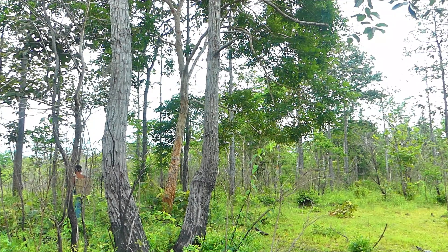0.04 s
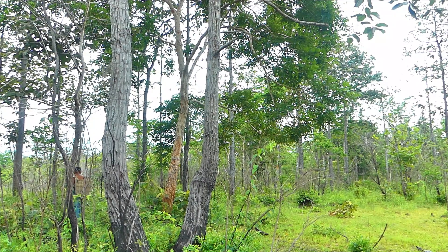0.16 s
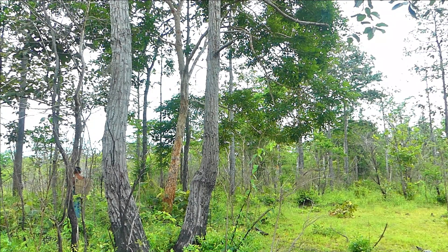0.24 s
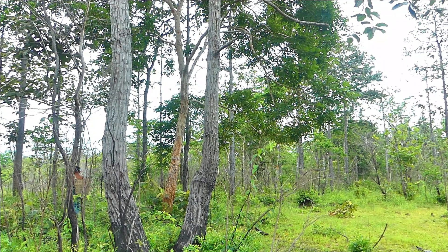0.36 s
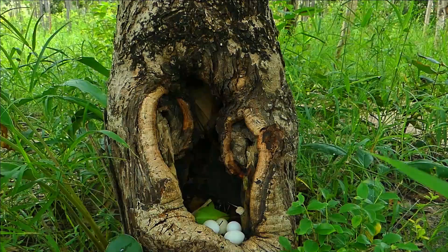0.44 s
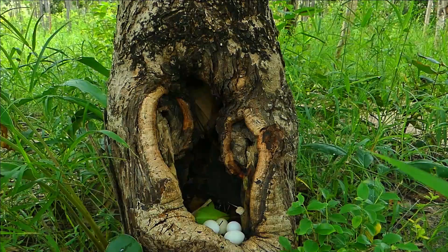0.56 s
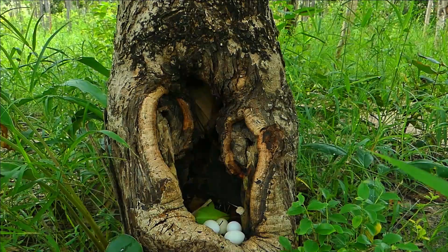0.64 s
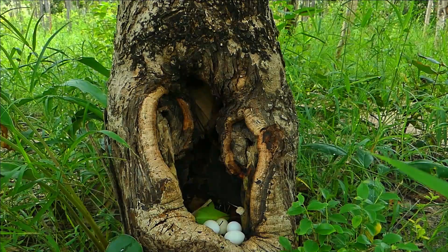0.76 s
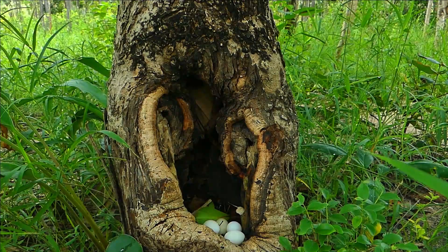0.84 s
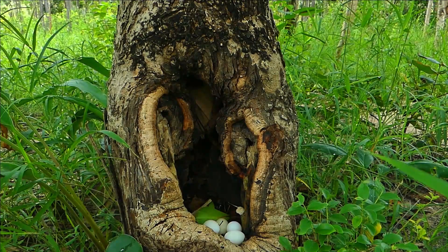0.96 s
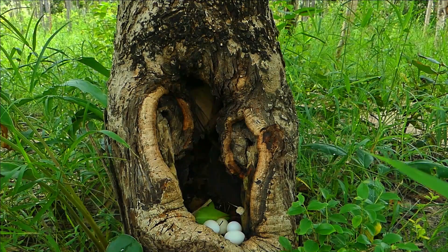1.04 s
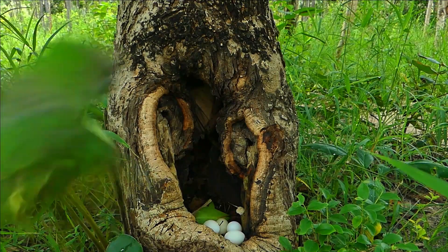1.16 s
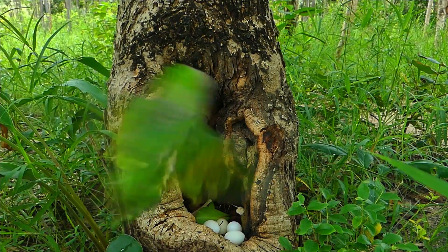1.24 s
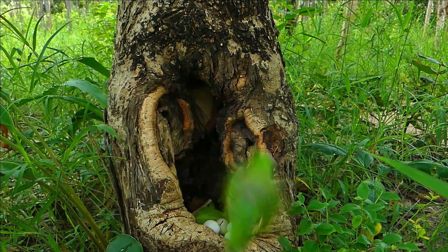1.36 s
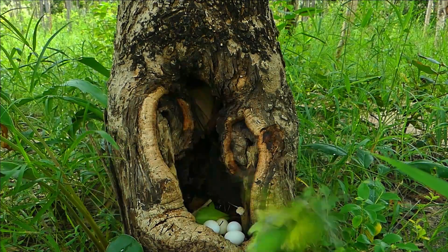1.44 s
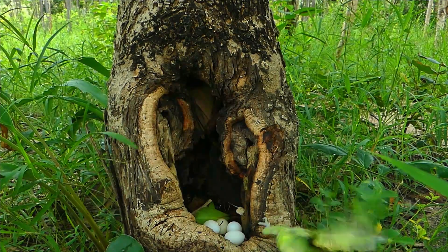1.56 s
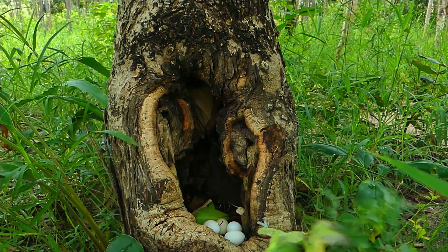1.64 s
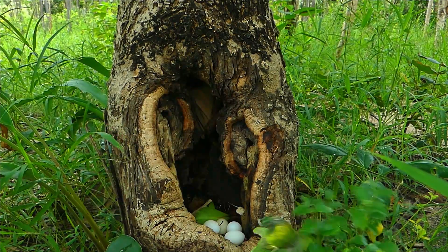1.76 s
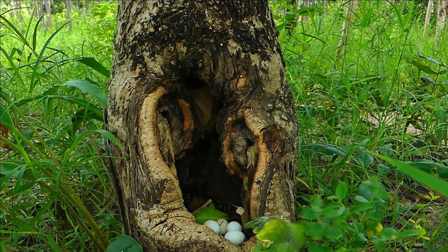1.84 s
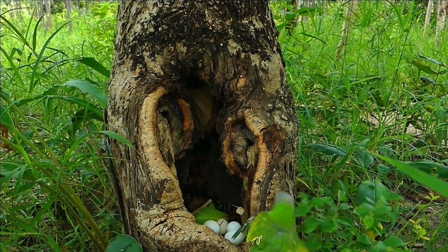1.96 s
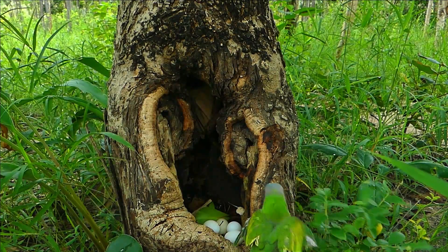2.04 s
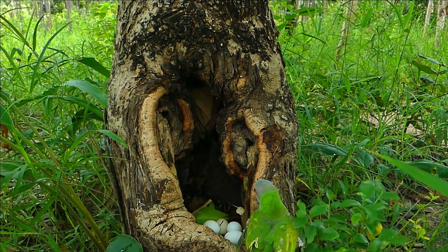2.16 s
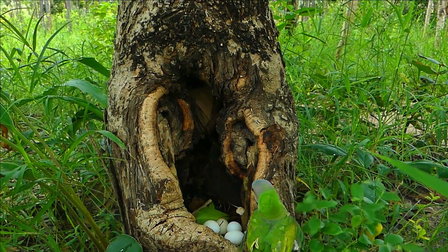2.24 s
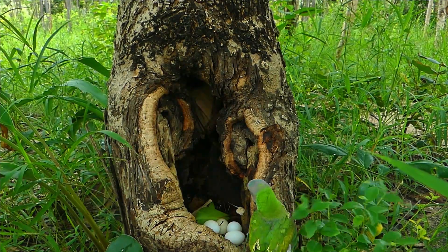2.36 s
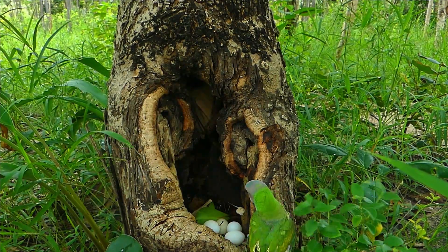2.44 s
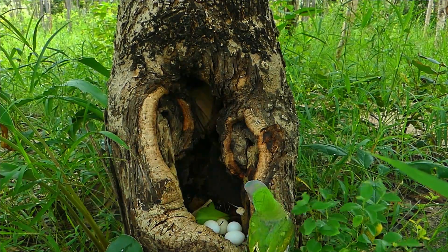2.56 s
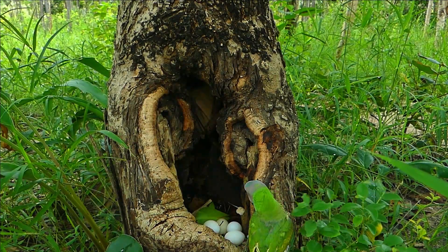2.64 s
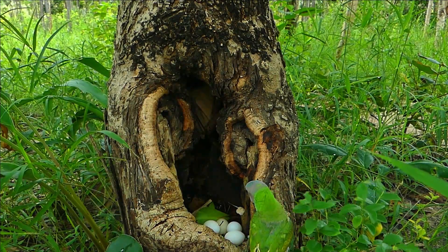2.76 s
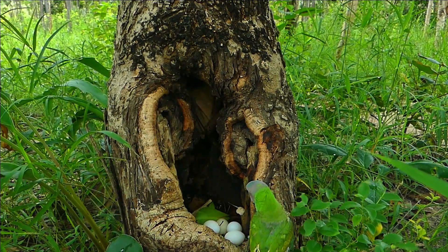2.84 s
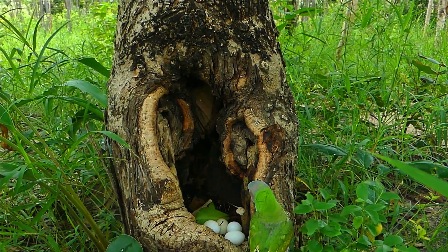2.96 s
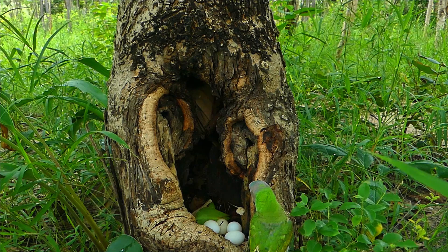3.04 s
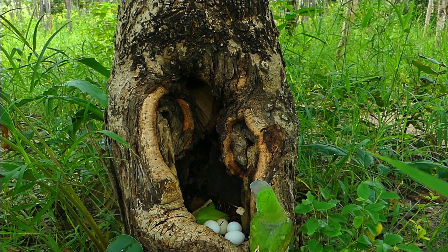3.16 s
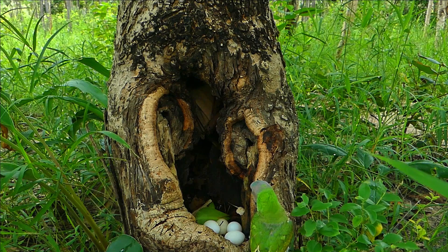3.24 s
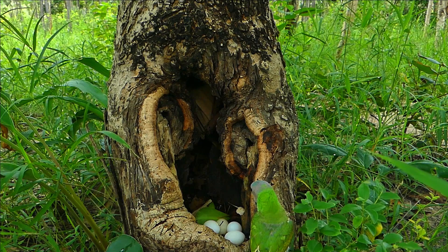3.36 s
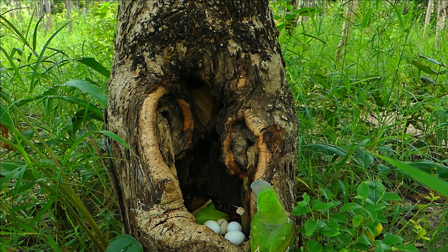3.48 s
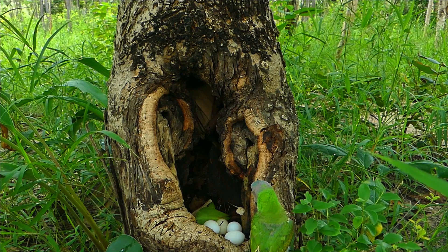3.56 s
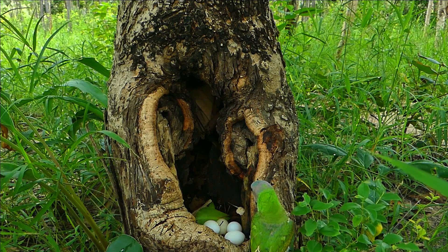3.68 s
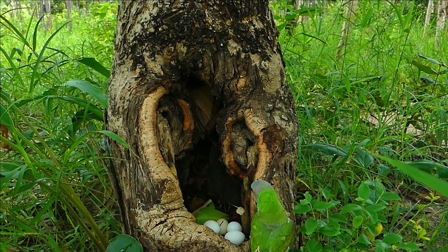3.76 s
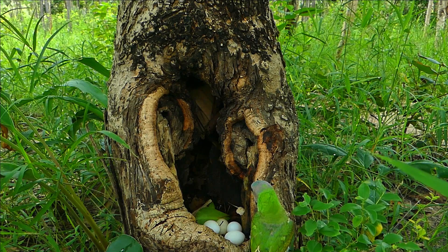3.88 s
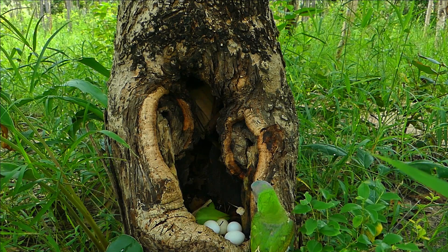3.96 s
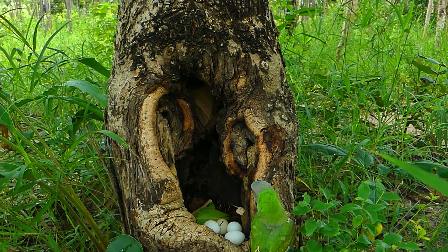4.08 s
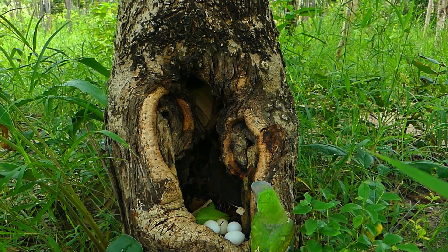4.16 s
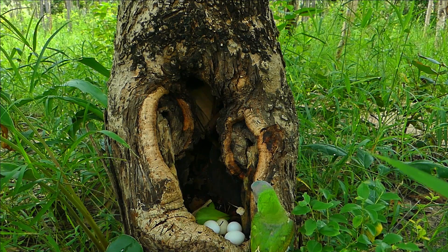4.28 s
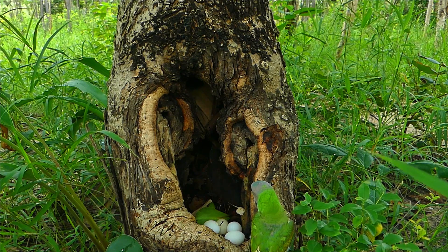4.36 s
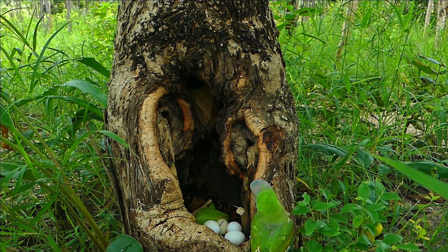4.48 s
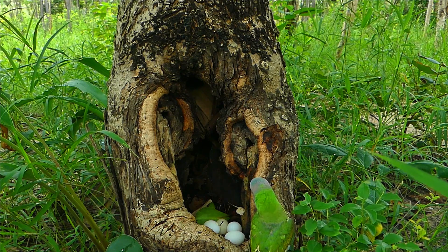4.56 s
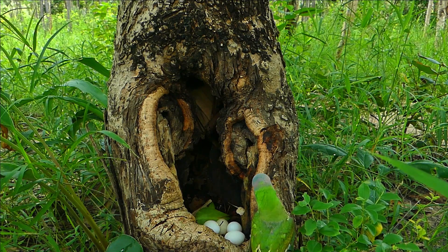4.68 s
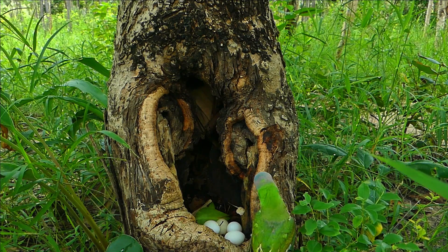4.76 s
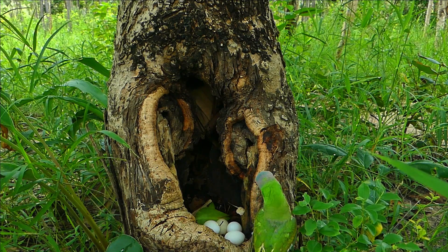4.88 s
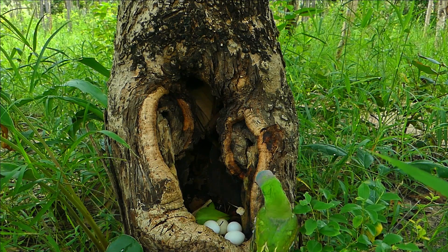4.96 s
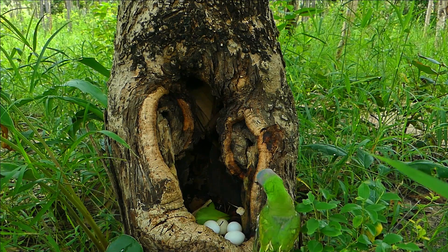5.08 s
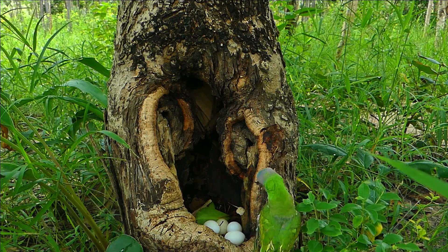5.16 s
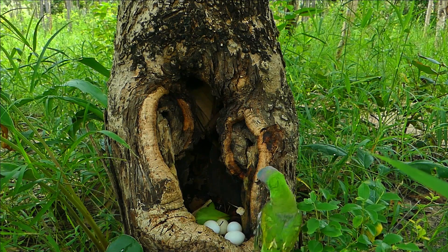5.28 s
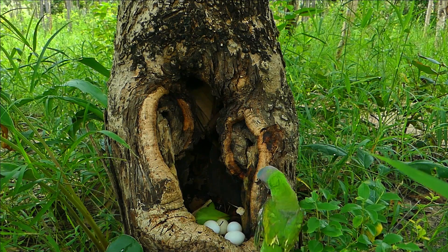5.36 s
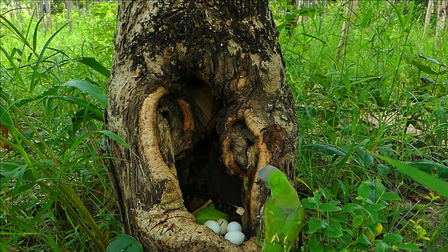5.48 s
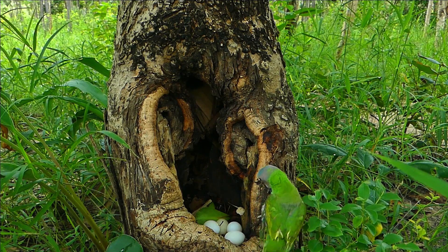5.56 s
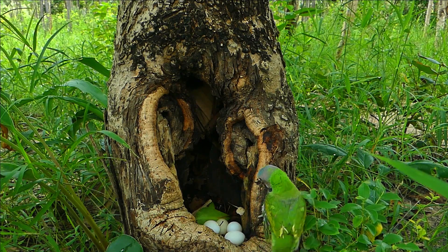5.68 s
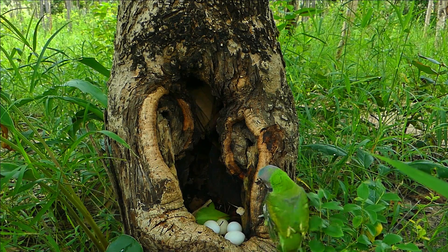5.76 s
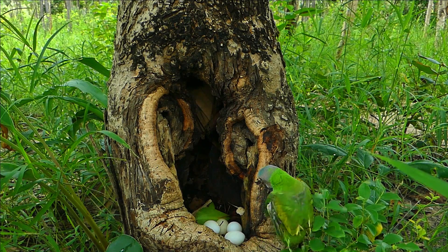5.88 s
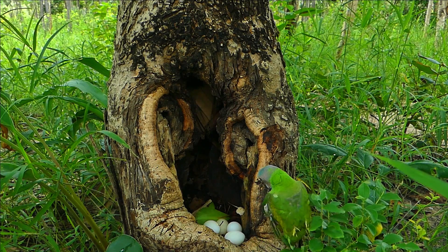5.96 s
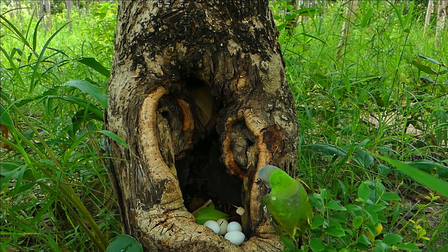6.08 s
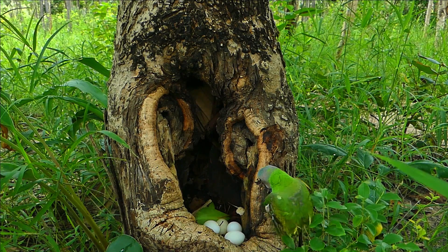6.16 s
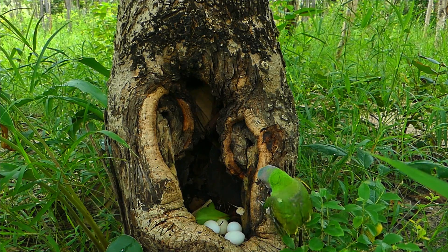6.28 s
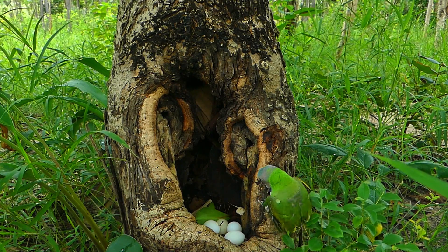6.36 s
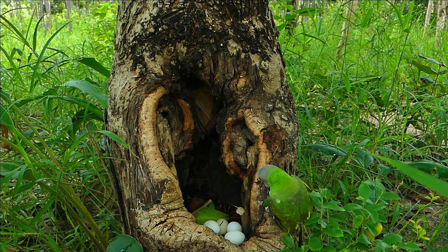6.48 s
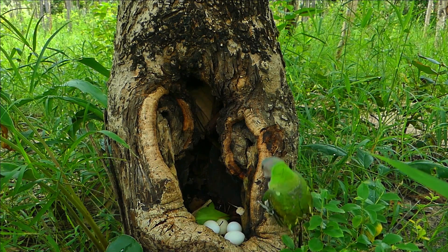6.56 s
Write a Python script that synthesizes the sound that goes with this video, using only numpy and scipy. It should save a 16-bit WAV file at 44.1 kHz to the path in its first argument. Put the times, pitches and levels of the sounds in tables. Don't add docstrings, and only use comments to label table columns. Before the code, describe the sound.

Soft insect hiss and dull forest air surround a hollow trunk, the opening moment a slightly different, wider insect ambience with faint distant calls. Two microphones close to the nest catch a bird's quick flapping descent, strong at first and then lighter, with claws scrabbling as it lands. Long near-stillness follows, broken by tiny claw ticks, scrapes and leaf brushes, two short far trills, and a muted wing push-off at the very end.

```python
import sys
import numpy as np
from scipy import signal
from scipy.fft import rfft, irfft, next_fast_len
from scipy.io import wavfile
from scipy.ndimage import uniform_filter1d, map_coordinates

SR = 44100
rng = np.random.default_rng(int(sys.argv[2]) if len(sys.argv) > 2 else 0)


def boost(x):
    u = np.asarray(x, float) / 20
    return 10 ** u


def bounce(signal):
    frames = np.transpose(np.atleast_2d(signal))
    limited = np.clip(frames, -1, 1)
    pcm = np.round(limited * 32767).astype(np.int16)
    wavfile.write(sys.argv[1], SR, pcm)


N = 291942

# t/s, peak level/dB, clap f/Hz, feather hiss/dB re clap,
# length/s
DOWNSTROKES = [(1.116, -22.5, 940, -21, .0055), (1.1849, -10.5, 1620, -9, 0.0094),
               (1.2483, -13.5, 1900, -25, 0.012), (1.3188, -16.5, 2100, -38, 0.0072),
               (1.372, -31, 1410, -17, 0.0084), (1.434, -33, 950, -23, 0.00775),
               (1.54, -30, 800, 3, 0.0064), (1.597, -30, 1416, -22, .0067)]
# t/s, peak level/dB, clap f/Hz, feather hiss/dB re clap
UPSTROKES = [(1.079, -28.5, 850, -18), (1.142, -32, 886, -3), (1.207, -34, 2200, -9),
             (1.267, -38, 2160, -11.5), (1.301, -31.5, 1510, -21), (1.339, -33.5, 750, -20),
             (1.404, -36, 1410, -3.5), (1.459, -42, 718, -6.5), (1.485, -38, 865, -5),
             (1.504, -29.5, 3015, -1), (1.514, -35, 950, 4), (1.627, -34, 1630, -9), (6.522, -48, 3040, 3),
             (6.561, -46, 2950, 9), (6.587, -49, 830, 2.5), (6.594, -44, 990, 5), (6.61, -41, 684, -6)]
# t/s, wing effort/dB, leaf contact/dB
FLIGHTS = [
    [(1.02, -62, -62), (1.036, -42.5, -46), (1.15, -37, -60.5), (1.24, -37, -49), (1.36, -46, -58),
     (1.45, -45.5, -60), (1.55, -45.5, -47), (1.66, -50, -47.5), (1.75, -63, -68.5)],
    [(6.45, -90, -77), (6.54, -71, -56), (6.575, -57, -59), (6.6, -43.5, -53), (6.62, -43, -55.5)],
]
# f/Hz, level/dB per Hz
BUFFET_SPECTRUM = [(25, -42), (55, -22), (90, 2.5), (160, -1.5), (280, 1.5), (450, -4), (800, -20),
                   (1500, -20.5)]
# f/Hz, level/dB per Hz
SWISH_SPECTRUM = [(400, -4), (700, 3), (1200, -4), (2000, -12), (3500, -41)]
# t/s, peak level/dB, f/Hz, bark level/dB re tick, bark f/Hz
CLAW_TICKS = [(1.031, -29.5, 4100, -3.5, 925), (1.0374, -25, 10200, -18, 982), (1.06, -32, 5670, -4.5, 861),
              (1.5408, -16, 11000, -16, 1000), (1.589, -25, 3960, -15, 2485),
              (1.5988, -27, 12360, -13, 2170), (1.618, -27, 4260, -10, 3160), (1.6444, -30, 4770, -8, 2360),
              (1.705, -36.5, 7080, -12, 2310), (2.2818, -36, 4640, -5.5, 1020),
              (3.6837, -34, 10600, -26, 1350), (3.7214, -50, 4980, -21, 945),
              (3.7437, -47.5, 6180, -17, 1040), (3.7614, -46, 4710, -18, 1880),
              (3.997, -47.5, 6200, -6.5, 2900), (5.0796, -36, 7740, -30, 837),
              (5.1094, -21.5, 11000, -33, 3000), (5.1734, -34, 12500, -21, 1860),
              (5.3494, -50, 7660, -11, 3330)]
# t/s, peak level/dB, f/Hz, bark level/dB re tick, bark f/Hz
CLAW_SCRAPES = [(.3491, -49, 9120, -5, 2380), (1.7894, -40, 10260, -9, 1640), (2.0894, -47, 7330, -6, 3170),
                (2.359, -46.5, 7600, -8, 3950), (2.378, -49, 7700, -4.5, 3320), (4.086, -56, 7550, 0, 990),
                (4.1117, -39.5, 5800, -11, 3450), (4.1163, -29.5, 11100, -17, 1020),
                (4.1225, -36, 10500, -12.5, 1000), (4.1535, -32, 8960, -28, 3000),
                (4.1705, -35.5, 9500, -19, 2520), (5.792, -37, 9880, -11.5, 3490),
                (5.8394, -46, 5910, -13, 1450), (6.563, -40, 9160, -10, 3000)]
# t/s, peak level/dB, f/Hz
WOOD_KNOCKS = [
    (0.588, -48.5, 280),
    (0.648, -52, 317),
    (0.927, -45, 317),
    (0.98, -49, 305),
    (1.834, -42.5, 313),
    (2.416, -55, 463),
    (4.118, -52.5, 377),
    (6.588, -43, 169),
    (6.606, -37.5, 152),
]
# start t/s, hold/s, leaf level/dB, duller plumage/dB re leaves
BRUSHES = [(0.194, 0.043, -65.5, -4), (0.364, 0.034, -59.5, -4.5), (0.948, 0.076, -65, -10),
           (1.75, 0.08, -66.5, 6), (1.86, 0.19, -72.5, 3.5), (2.09, 0.018, -69, 0.5),
           (3.69, 0.19, -77, -4.5), (4.11, 0.083, -63.5, -6), (4.818, .03, -69, -0.5),
           (5.018, 0.21, -64.5, -5.5), (5.233, 0.037, -75.5, 12), (5.298, 0.16, -67, -4.5),
           (5.497, 0.27, -72.5, -2), (5.784, 0.011, -57, -3), (5.853, 0.23, -78.5, 0)]
# f/Hz, level/dB per Hz
LEAF_SPECTRUM = [(2500, -40), (5000, 0.5), (7000, -2), (10000, 3), (13000, -5.5), (16000, -13)]
# f/Hz, level/dB per Hz
PLUMAGE_SPECTRUM = [(1200, -6.5), (2200, -4), (3200, -3.5), (5000, -6.5), (8000, -14)]
# f/Hz, left minus right level/dB
PORT_LEAN = [(60, -20), (200, -16), (700, -8), (2000, -1), (4000, 0.5), (15000, 4)]
# f/Hz, left phase lead/rad
PORT_LEAD = [(100, 2.35), (700, 1.64), (1300, 1.3), (2100, 1.06), (3500, 0.71), (5500, 0.16), (15000, .1)]
# f/Hz, unrelated difference level/dB
PORT_SPREAD = [(100, -9), (700, -14), (2000, -12), (5000, -9), (15000, -6)]
# start t/s, hold/s, level/dB
TRILLS = [
    (3.505, .09, -52.5),
    (6.384, 0.059, -52.5),
]
# start t/s, length/s, f/Hz, level/dB
FAR_CALLS = [
    (0.013, 0.064, 2480, -66.5),
    (0.07, 0.1, 2550, -71.5),
    (0.187, 0.17, 1430, -72),
    (0.366, 0.11, 1450, -71),
    (2.775, 0.021, 2170, -67),
]
# t/s, level/dB
CICADA_LEVEL = [(0.0, -66), (1.05, -67), (2.0, -67), (2.5, -65), (2.9, -68.5), (3.3, -64.5), (3.95, -72),
                (4.3, -66), (6.62, -66.5)]
# start t/s, hold/s, level/dB
KATYDID = (2.37, 0.45, -66.5)
# t/s, level/dB
DRONE_LEVEL = [(0.0, -72), (1.0, -74.5), (1.9, -68.5), (2.6, -65), (3.4, -76), (3.85, -76), (4.2, -67.5),
               (4.65, -69), (4.9, -72), (5.2, -68), (5.55, -64.5), (5.85, -70), (6.62, -70.5)]
# f/Hz, level/dB per Hz
AIR_MID_SPECTRUM = [(15, -46), (25, -28), (101, 4), (341, 2), (390, -2), (458, -2.5), (584, -2), (1310, -6),
                    (4770, -14), (6590, -7.5), (7540, -6), (8630, -9.5), (15600, -14.5)]
# f/Hz, level/dB per Hz
AIR_SIDE_SPECTRUM = [(15, -44), (25, -29.5), (48, -27), (108, -7), (309, -1), (427, -7), (911, -13),
                     (1100, -14.5), (4030, -31), (7510, -30.5), (16000, -33.5)]


def wings():
    out = np.zeros((2, N))
    beats = [(*row, -6.5) for row in DOWNSTROKES]
    beats += [(*row, 0.0078, -4.5) for row in UPSTROKES]  # length_s, thump_db re clap
    for s, db, hz, hiss_db, length_s, thump_db in beats:
        s -= 0.14906 * length_s
        clap = lambda f: peak(hz, 0.55 * hz)(f) * peak(0.6 * hz, 1.6 * hz)(f) * peak(0.7 * hz, 2.5 * hz)(f)
        thump = lambda f: peak(310, 420)(f) ** 2
        hiss = lambda f: peak(6500, 11000)(f) ** 2
        add(out, s, boost(db) * puff(clap, length_s, 3.5, slaps_hz=600))
        add(out, s + 0.462 * length_s, boost(db + thump_db) * puff(thump, 0.52 * length_s, 3.7, slaps_hz=0))
        add(out, s, boost(db + hiss_db - 1) * puff(hiss, 0.9 * length_s, 2.5, slaps_hz=300))
    effort, _, lull = flight()
    buffet_db = -1.5 - 6.1 * lull + 1.5 * wobble(29.98)
    out += effort * boost(buffet_db) * noise(colour(BUFFET_SPECTRUM))
    swish_db = -7.5 - 19 * lull + 1.9 * wobble(70)
    return out + effort * boost(swish_db) * noise(colour(SWISH_SPECTRUM))


def flight():
    effort, contact = sum(boost(curves(rows)) for rows in FLIGHTS)
    t = np.arange(N) / SR
    delay_s, width_s = 0.039, 0.014
    lull = sum(np.exp(-((t - s - delay_s) / width_s) ** 2) for s, *_ in DOWNSTROKES[1:])
    return effort, contact, lull


def claws():
    out = np.zeros((2, N))
    tick_s, scrape_s = 0.0013, 0.0038
    hits = [(*row, tick_s) for row in CLAW_TICKS] + [(*row, scrape_s) for row in CLAW_SCRAPES]
    for s, db, hz, bark_db, bark_hz, length_s in hits:
        tick = lambda f: peak(hz, 0.9 * hz)(f) * peak(hz, 2.2 * hz)(f)
        bark = lambda f: peak(bark_hz, 260)(f) - 0.27 * peak(2500, 3500)(f)
        add(out, s, boost(db) * puff(tick, length_s, 1.58, slaps_hz=340))
        add(out, s, boost(db + bark_db + 3.0) * puff(bark, length_s, 0.67, slaps_hz=940))
    for s, db, hz in WOOD_KNOCKS:
        knock = lambda f: (peak(hz, 160)(f) - 0.94 * peak(1.9 * hz, 160)(f)) * peak(hz, 600)(f)
        add(out, s, boost(db) * puff(knock, 0.005, 2.1, slaps_hz=0))
    return out


def rustle():
    effort, contact, lull = flight()
    stir_db = -77
    leaves = boost(stir_db) + contact * boost(-8 * lull)
    plumage = boost(stir_db - 0.5) + (boost(-7) * effort + boost(-4) * contact) * boost(-8.5 * lull)
    for s, hold_s, db, dull_db in BRUSHES:
        brush = boost(db) * swell(s, hold_s, attack_s=0.025, release_s=0.025)
        leaves = leaves + brush
        plumage = plumage + boost(dull_db) * brush
    grain = unit(boost(1.1 * wobble(45) + 3 * wobble(500)))
    leaf_noise = boost(2.0) * leaves * noise(colour(LEAF_SPECTRUM))
    plumage_noise = boost(1.04) * plumage * noise(colour(PLUMAGE_SPECTRUM))
    return grain * (leaf_noise + plumage_noise)


def near(pair):
    left = lambda f: boost(along(PORT_LEAN, f) / 2) * np.exp(0.5j * along(PORT_LEAD, f))
    lean = filtered(pair[0], lambda f: (left(f) - 1 / left(f)) / (left(f) + 1 / left(f)))
    side = lean + filtered(pair[1], colour(PORT_SPREAD))
    return np.array([pair[0] + side, pair[0] - side])


def grove(x):
    level_db, t60_s, centre_hz = -22, 1.74, 1210
    t = np.arange(SR) / SR
    tail = filtered(rng.standard_normal((2, SR)) * boost(-60 * t / t60_s), peak(centre_hz, 2800))
    return boost(level_db) * signal.fftconvolve(x[None], tail / np.linalg.norm(tail[0]), axes=1)[:, :N]


def trills():
    t = np.arange(N) / SR
    effort = sum(trill_effort(*row) for row in TRILLS)
    cycle = np.cumsum(72 + 3 * wobble(20)) / SR % 1
    depth_hz = 90 + 850 * uniform_filter1d(effort / effort.max(), size=1200)
    hz = 5150 - depth_hz * cycle ** 1.9
    pulse = np.sin(np.pi * cycle ** 0.75) ** 0.6
    voice = effort * unit(np.sin(2 * np.pi * np.cumsum(hz) / SR) * pulse)
    echo = rng.standard_normal((2, SR // 3)) * boost(-60 * t[:SR // 3] / 0.2)
    blurred = signal.fftconvolve(voice[None], echo / np.linalg.norm(echo[0]), axes=1)[:, :N]
    out = boost(-3.5) * voice + boost(-3.5) * blurred
    for s, length_s, call_hz, db in FAR_CALLS:
        shape = np.exp(-((t - s - length_s / 2) / (0.5 * length_s)) ** 2)
        out[0] += boost(db) * shape * noise(peak(call_hz, 110), channels=1)[0]
    return np.array([1.21 * out[0] + 0.24 * out[1], 1.0 * out[0] - 0.24 * out[1]])


def trill_effort(s, hold_s, db):
    attack_s, crest_db = 0.0091, 4
    t = np.arange(N) / SR
    crest = boost(crest_db * np.exp(-((t - s - 0.56 * hold_s) / (0.3 * hold_s)) ** 2))
    tail = boost(-8) * swell(s + hold_s, 0.064, attack_s, release_s=0.039)
    return boost(db - 4.5) * np.maximum(crest * swell(s, hold_s, attack_s, release_s=0.0152), tail)


def cicadas():
    cut_s = 0.52
    here = 1 / (1 + np.exp((cut_s - np.arange(N) / SR) / 0.004))
    buzz = boost(curves(CICADA_LEVEL)[0] + 1.13 * wobble(100) + wobble(6.7))
    close_band = lambda f: peak(7330, 420)(f) ** 2 - peak(7780, 600)(f) ** 2
    wide_band = lambda f: (peak(7950, 600)(f) ** 2 + 1.1 * peak(9100, 800)(f) ** 2
                           + 0.55 * peak(11600, 500)(f) ** 2)
    mid, side = buzz * (here * noise(close_band) + boost(3) * (1 - here) * noise(wide_band))
    s, hold_s, db = KATYDID
    rasp = noise(lambda f: peak(9900, 3500)(f) ** 2, channels=1)[0]
    mid = mid + boost(db) * swell(s, hold_s, attack_s=0.019, release_s=0.025) * rasp
    return np.array([mid + 0.22 * side, mid - 0.32 * side])


def woodland():
    upper_db, = curves(DRONE_LEVEL)
    lower_db = upper_db.max() - 4 + 1.46 * (upper_db - upper_db.max())
    breeze_db = 0.19 * (upper_db - upper_db.mean())
    drone = boost(upper_db + 2.6 * wobble(14)) * noise(lambda f: peak(465, 90)(f) ** 2)
    drone += boost(lower_db + 1.7 * wobble(15)) * noise(lambda f: peak(300, 160)(f) ** 2)
    air_mid = boost(-61.5 + breeze_db + 0.6 * wobble(7)) * noise(colour(AIR_MID_SPECTRUM), channels=1)[0]
    air_side = boost(-57 + breeze_db + 0.5 * wobble(7)) * noise(colour(AIR_SIDE_SPECTRUM), channels=1)[0]
    mid = drone[0] + air_mid
    side = boost(1.5) * drone[1] + air_side
    side -= filtered(mid, lambda f: 0.93 / (1 + (f / 1500) ** 2))
    return np.array([mid + side, mid - side])


def puff(response, length_s, edge, slaps_hz):
    t = np.arange(SR // 12) / SR
    rise = 1 - np.exp(-t / (0.18 * length_s))
    fall = np.exp(-(t / length_s) ** edge) + 0.14 * np.exp(-t / (0.004 + length_s))
    slap = rng.random(len(t)) < slaps_hz / SR
    force = rng.standard_normal((2, len(t))) * (1 + 5 * slap)
    x = filtered(rise * fall * force, response)
    return x / np.abs(x).max(axis=1, keepdims=True)


def add(track, s, x):
    part = track[:, round(s * SR):][:, :x.shape[1]]
    part += x[:, :part.shape[1]]


def swell(s, hold_s, attack_s, release_s):
    t = np.arange(N) / SR
    rise = (np.clip(s - t, 0, None) / attack_s) ** 2
    fall = np.clip(t - s - hold_s, 0, None) / release_s
    return np.exp(-rise - fall)


def curves(rows):
    s, *cols = np.transpose(rows)
    return [np.interp(np.arange(N) / SR, s, c, left=-120, right=-120) for c in cols]


def wobble(rate_hz):
    knots = rng.standard_normal(int(N * rate_hz / SR) + 4)
    return map_coordinates(knots, [np.arange(N) * rate_hz / SR])


def noise(response, channels=2):
    return unit(filtered(rng.standard_normal((channels, N)), response))


def colour(points):
    return lambda f: boost(along(points, f))


def peak(hz, width_hz):
    return lambda f: 1j * f * width_hz / (hz * hz - f * f + 1j * f * width_hz)


def filtered(x, response):
    n = x.shape[-1]
    m = next_fast_len(n + 4096)
    return irfft(rfft(x, m) * response(np.fft.rfftfreq(m, 1 / SR)), m)[..., :n]


def along(points, hz):
    f, v = np.transpose(points)
    return np.interp(np.log(hz + 1), np.log(f + 1), v)


def unit(x):
    return x / np.sqrt(np.mean(x ** 2) + 1e-20)


def scene():
    bird = wings() + claws() + rustle()
    return near(bird) + trills() + cicadas() + woodland() + grove(bird[0])


def roll_off(x):
    return signal.sosfilt(signal.butter(12, 16830, fs=SR, output="sos"), x)


def record(dry):
    rounded = dry / (1 + np.abs(dry / 0.4) ** 4) ** (1 / 4)
    top_hz = 15750
    mix = filtered(rounded, lambda f: f < top_hz)
    return roll_off(mix)


dry = scene()
out = record(dry)
bounce(out)
```